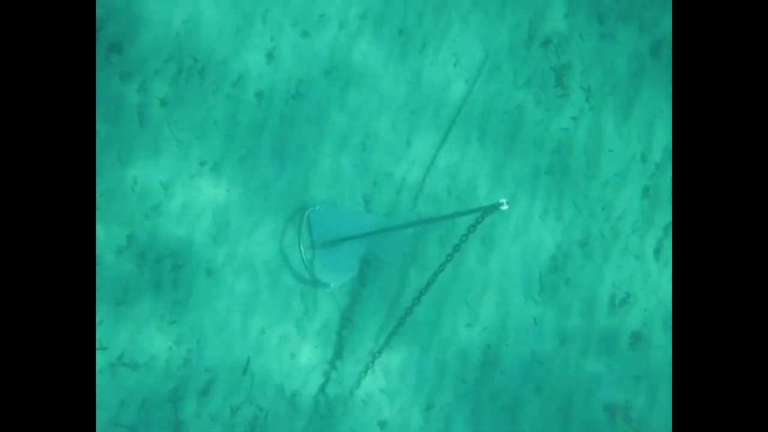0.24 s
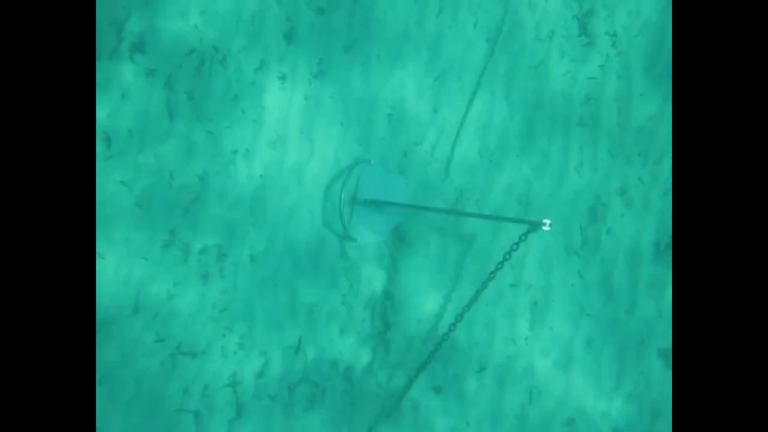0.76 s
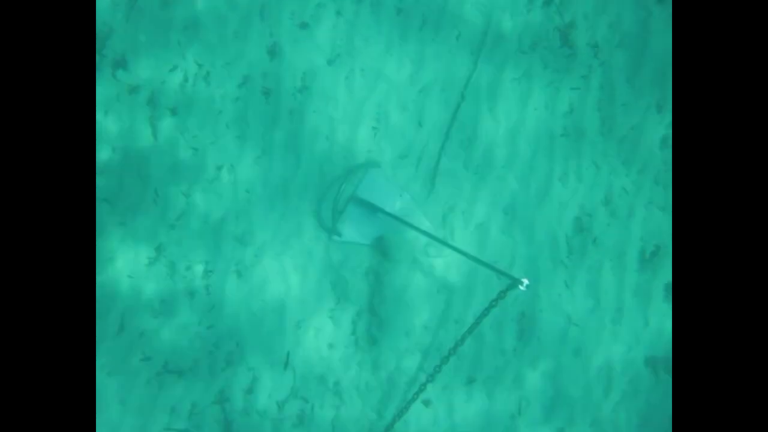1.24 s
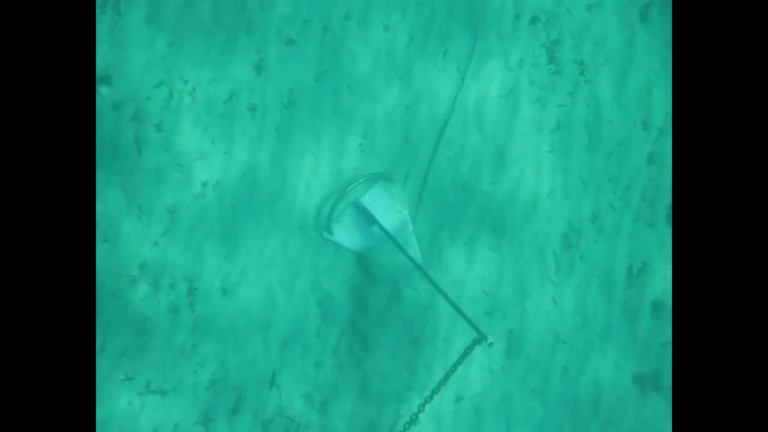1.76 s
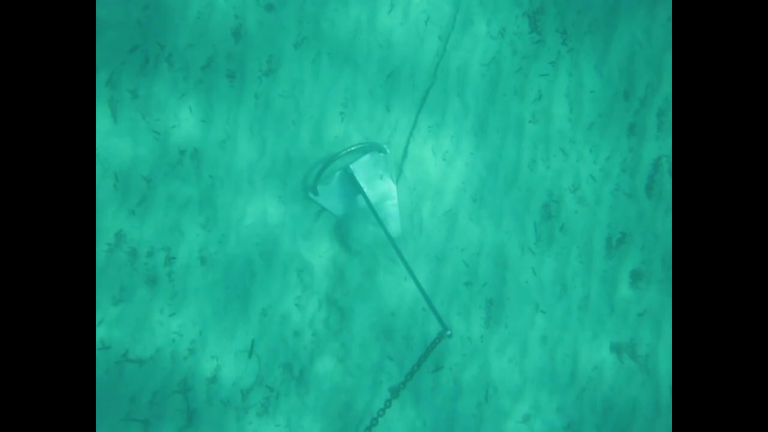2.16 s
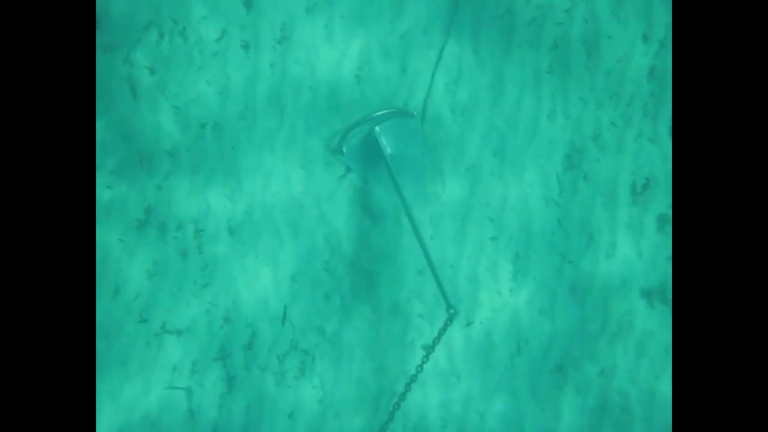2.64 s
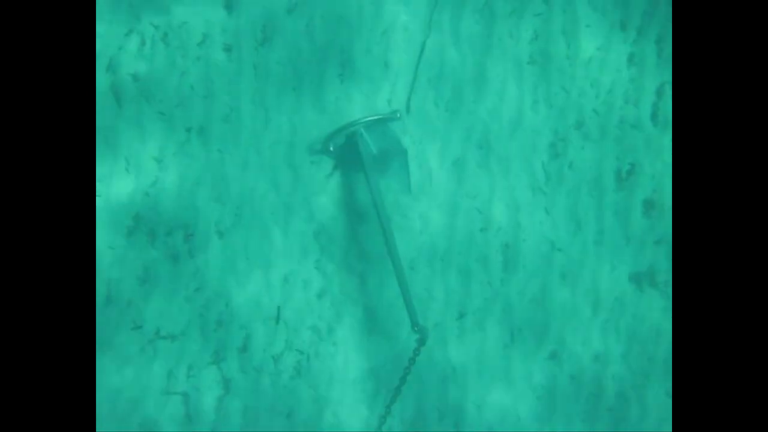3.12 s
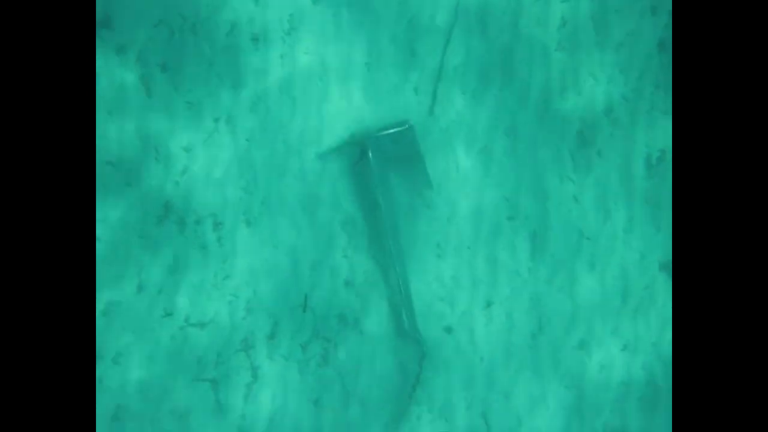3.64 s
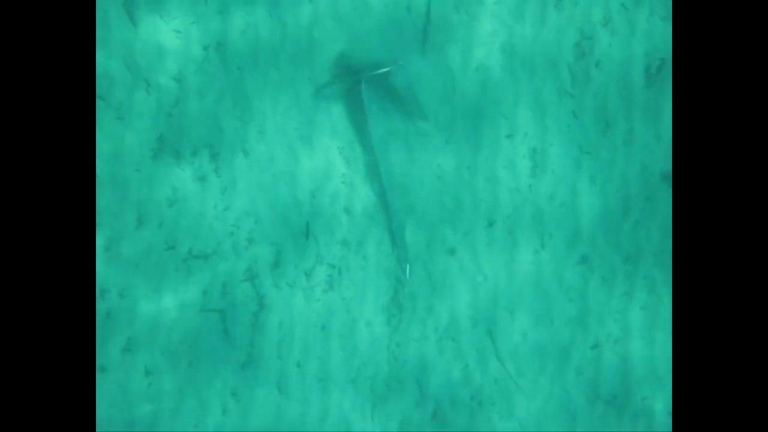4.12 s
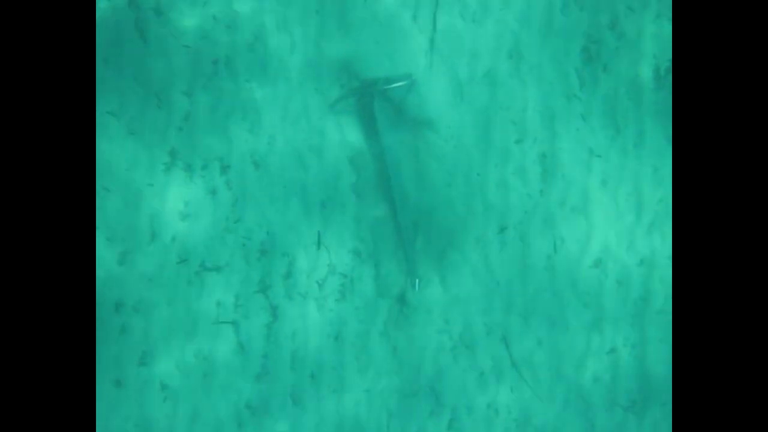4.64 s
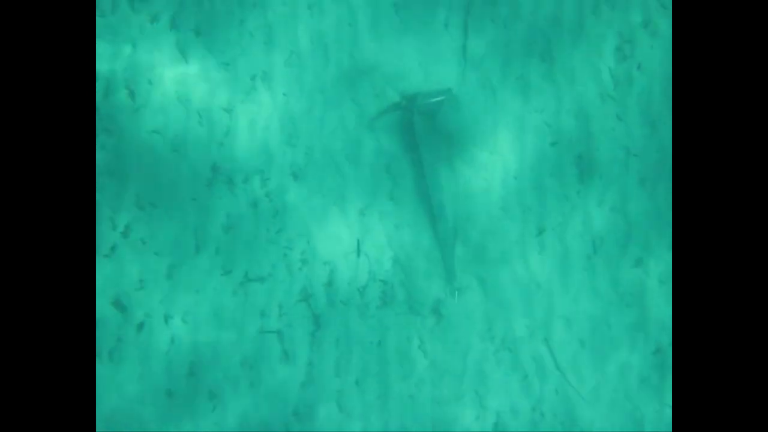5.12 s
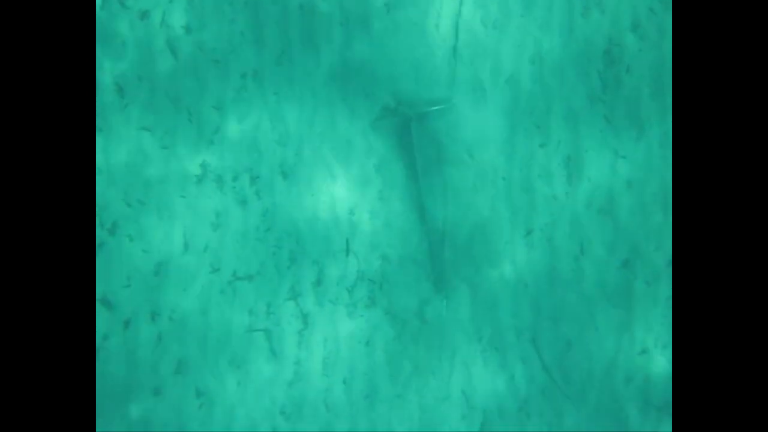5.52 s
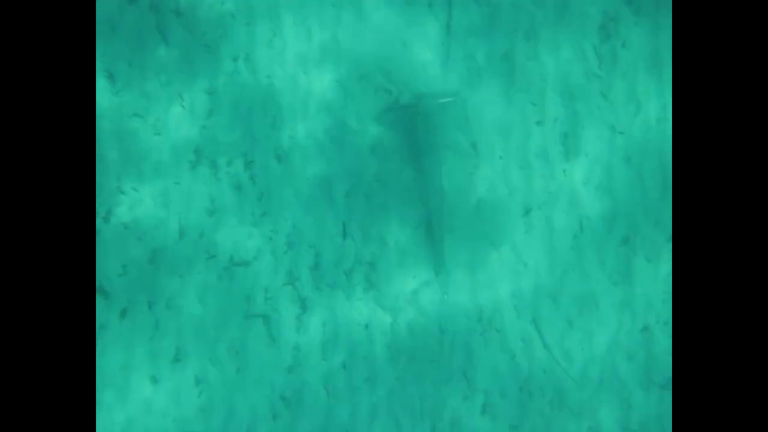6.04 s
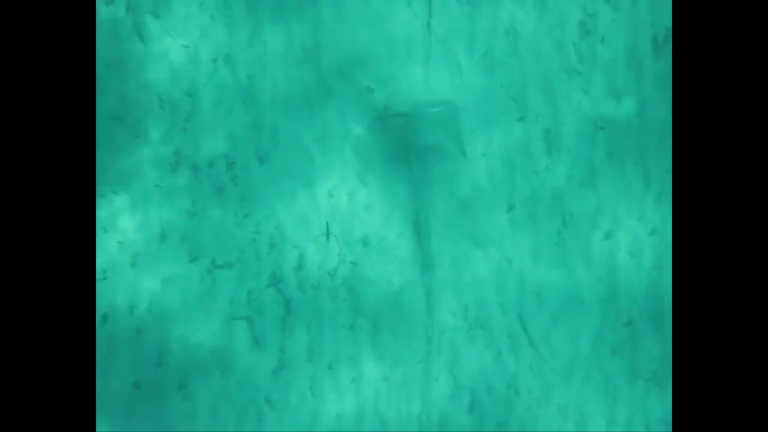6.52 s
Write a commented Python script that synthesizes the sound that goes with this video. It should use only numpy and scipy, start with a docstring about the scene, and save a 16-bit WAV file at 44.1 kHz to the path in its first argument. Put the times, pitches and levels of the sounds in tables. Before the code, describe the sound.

A boat propeller drones underwater, muffled and fluttering over thin fizz, with dull knocks, short creaks and a few anchor chain clinks.

```python
"""A boat runs astern and drags its anchor into sand, heard under water from inside a camera housing.
From the start, collapsing propeller bubbles ring the housing near 500 Hz: a muffled, fluttering drone
over thin fizz. From 0.7 s the housing is bumped; near 1.5 and 3 s it is knocked and creaks. The chain
clinks from 3.7 s, the fizz swells to 5.2 s as the anchor digs in, and two more knocks land near 6 s.
Throughout, the level dips briefly after the hardest blows and a limiter holds the peaks down."""
import sys
import numpy as np
from scipy import signal
from scipy.fft import rfft, irfft, next_fast_len
from scipy.io import wavfile
from scipy.ndimage import uniform_filter1d

SR = 44100
rng = np.random.default_rng(int(sys.argv[2]) if len(sys.argv) > 2 else 0)


def int16_out(signal):
    """Quantize to a 16-bit WAV file."""
    q = np.round(np.clip(np.atleast_2d(signal).T, -1, 1) * 32767)
    wavfile.write(sys.argv[1], SR, q.astype(np.int16))


N = 298557
TIME_S = np.arange(N) / SR


def gain_of(db):
    """Decibels to amplitude."""
    return 10 ** (np.asarray(db) / 20)


def unit_rms(x):
    """Scale to rms 1."""
    return x / np.sqrt(np.mean(x ** 2) + 1e-20)


def unit_peak(x):
    """Scale to peak 1."""
    return x / abs(x).max()


def add(mix, start_s, sound):
    """Mix a sound in at start_s."""
    part = mix[max(round(start_s * SR), 0):][:len(sound)]
    part += sound[:len(part)]


def bins_hz(size=8192):
    """FFT frequency grid."""
    return np.fft.rfftfreq(size, 1 / SR)


def colour(spectrum, hz):
    """Gain of an (f/Hz, level/dB) table, interpolated over log frequency."""
    points_hz, db = np.transpose(spectrum)
    return gain_of(np.interp(np.log(hz + 1), np.log(points_hz + 1), db))


def minimum_phase(gain):
    """Sharpest-starting impulse response with this gain."""
    log_gain = np.log(np.concatenate([gain, gain[-2:0:-1]]) + 1e-7)
    spectrum = np.exp(np.conj(signal.hilbert(log_gain)))
    return np.fft.ifft(spectrum).real[:len(gain)]


def wavering(samples, smooth_s):
    """Smoothed noise, rms 1."""
    return unit_rms(uniform_filter1d(rng.standard_normal(samples), max(int(smooth_s * SR), 1)))


# Housing resonances: f/Hz, width/Hz, relative level/dB
HOUSING_MODES = [(475.1, 52.8, 1.5), (530.3, 39.4, 1.5), (622.8, 81.4, -5), (744, 42, -14.5),
                 (808.3, 87, -20), (1002, 23, -37.5), (1146, 25, -39), (1292, 44, -37), (2023, 61, -47),
                 (2310, 220, -50.5), (3260, 260, -57.5)]
# Leak through the wall: f/Hz, relative level/dB
WALL_LEAK = [(15, -44), (40, -34), (150, -41), (300, -46.5), (1100, -45.5), (1600, -49), (2300, -70),
             (3300, -64.5), (4000, -68), (5300, -62), (7300, -73.5), (11000, -75.5), (15500, -76.5)]


def housing_ring():
    """Response to one pressure spike: strong low resonances over a weak leak."""
    hz = bins_hz()
    power = sum(gain_of(db) ** 2 / (1 + (2 * (hz - mode_hz) / width_hz) ** 2) ** 2
                for mode_hz, width_hz, db in HOUSING_MODES)
    return minimum_phase(np.sqrt(power + colour(WALL_LEAK, hz) ** 2))


def propeller(swarm_db=-17, rate_per_s=900, spread_db=2.0):
    """Bubbles of all sizes collapse at random; each rings the housing."""
    sizes = gain_of(spread_db * np.minimum(rng.exponential(1, N), 3.24))
    spikes = sizes * rng.choice([-1., 1.], N) * (rng.random(N) < rate_per_s / SR)
    return gain_of(swarm_db) * unit_rms(signal.oaconvolve(spikes, housing_ring())[:N])


# Loudest collapses: t/s, relative crunch level/dB, relative ring level/dB
COLLAPSES = [(.5905, -36, -10.5), (.6684, -32, -14), (.9372, -29.5, -6.5), (1.3512, -40.5, -3.5),
             (1.7115, -34, -11.5), (1.8824, -39, -8), (2.2188, -31.5, -7), (2.5136, -33.5, -9.5),
             (3.2251, -41, -3.5), (3.3424, -38.5, -7.5), (3.4176, -34, -9.5), (4.3798, -37.5, -8),
             (5.648, -35, -5), (5.8101, -34.5, -11.5), (6.0534, -35.5, -11), (6.4514, -40, -8.5)]


def pops(crunch_trim_db=-3, ring_trim_db=3, crunch_s=0.0025, lesser_per_s=8, spread_db=3, count=150):
    """Bubble clouds collapse: a short crunch through the wall while the housing rings."""
    out, t, hz = np.zeros(N), TIME_S[:1024], bins_hz()
    ring = unit_peak(housing_ring())
    leak = minimum_phase(colour(WALL_LEAK, hz) * hz ** 2 / (hz ** 2 + 1000 ** 2) / (1 + hz / 9000))
    lesser_s = np.cumsum(rng.gamma(2, .5, count)) / lesser_per_s
    scatter_db = spread_db * np.clip(rng.standard_normal((count, 2)), -2, 2)
    lesser_db = [-37.5, -17.5] + scatter_db  # crunch, ring
    for start_s, crunch_db, ring_db in [*COLLAPSES, *np.column_stack([lesser_s, lesser_db])]:
        burst = rng.standard_normal(len(t)) * t * np.exp(-t / crunch_s)
        crunch = unit_peak(signal.fftconvolve(burst, leak))
        add(out, start_s - crunch_s / 2, gain_of(crunch_db + crunch_trim_db) * crunch)
        add(out, start_s, gain_of(ring_db + ring_trim_db) * ring)
    return out


def drone(level_db=-14.0, window_s=.1):
    """The drone is held at an even level, so it ducks briefly around each loud pop."""
    bubbles = propeller() + pops()
    power = uniform_filter1d(bubbles ** 2, int(window_s * SR))
    return gain_of(level_db) * bubbles / np.sqrt(abs(power) + 1e-12)


def crackle(drone_wave, level_db=-53, rate_per_s=3000, steepness=1.7, low_hz=1000, high_hz=2600):
    """Fine, sharp crackle in clumps, loudest at each swell of the drone."""
    swell = unit_rms(abs(signal.hilbert(drone_wave, next_fast_len(N)))[:N])
    clicks = rng.standard_normal(N) * (rng.random(N) < rate_per_s / SR) * swell ** steepness
    hz = bins_hz()
    grain = minimum_phase(hz ** 2 / (hz ** 2 + low_hz ** 2) / (1 + (hz / high_hz) ** 3))
    return gain_of(level_db) * unit_rms(signal.oaconvolve(clicks, grain)[:N])


# Far, fine bubbles: f/Hz, relative level/dB
FIZZ_SPECTRUM = [(30, 15.5), (1200, 17), (2300, -2), (2700, -4), (3250, 2.5), (3900, -14), (4700, 4.5),
                 (5600, 2.5), (6100, -23.5), (7000, -16), (7900, -4.5), (11000, -17), (15500, -20.5)]
# Swell as the anchor digs in: t/s, relative level/dB
FIZZ_ENVELOPE = [(0, -45), (1.3, -47.5), (2.6, -45), (3.5, -52), (4.1, -44.5), (5.2, -41), (5.45, -51),
                 (6.77, -49.5)]


def fizz(trim_db=-3.0, flicker_db=3.5, flicker_s=.025):
    """Countless far bubbles merge into a flickering hiss."""
    spectrum = rfft(rng.standard_normal(N)) * colour(FIZZ_SPECTRUM, bins_hz(N))
    hiss = unit_rms(irfft(spectrum, N))
    swell_db = np.interp(TIME_S, *np.transpose(FIZZ_ENVELOPE))
    return hiss * gain_of(swell_db + trim_db + flicker_db * wavering(N, flicker_s))


# Thin whine: f/Hz, rms level/dB
WHINE_TONES = [(7822, -86), (7852, -80), (7882, -75), (7912, -82.5), (12600, -91)]


def whine():
    """Steady high tones; the close ones beat."""
    return sum(gain_of(db) * np.sqrt(2) * np.sin(2 * np.pi * (hz * TIME_S + rng.random()))
               for hz, db in WHINE_TONES)


def rumble(length_s, centre_hz, width_hz):
    """Short swell of band noise, rms 1."""
    hz = bins_hz()
    band = 1 / (1 + ((hz - centre_hz) / width_hz) ** 4) * hz / (hz + 60)
    white = rng.standard_normal(2 * len(hz) - 2)
    noise = irfft(rfft(white) * band)[:int(length_s * SR)]
    return unit_rms(noise * signal.windows.tukey(len(noise), .7))


# Dull bumps, rubs and swirls of water: t/s, rms level/dB, length/s, centre/Hz, half-width/Hz
SOFT_CONTACTS = [(0.743, -20, 0.051, 250, 220), (0.924, -27, 0.042, 400, 150), (1.33, -19, 0.065, 543, 330),
                 (1.37, -28.5, 0.088, 200, 110), (1.435, -17.5, .06, 340, 150),
                 (1.768, -17.5, 0.019, 343, 120), (2.214, -16.5, 0.022, 300, 190),
                 (2.507, -24, 0.033, 785, 130), (2.96, -20.5, 0.041, 300, 240),
                 (3.151, -31, 0.055, 140, 110), (3.172, -23, .02, 680, 280), (3.223, -30, 0.087, 730, 190),
                 (3.761, -16.5, 0.0196, 373, 110), (4.659, -30, 0.03, 124, 110),
                 (5.968, -17.5, .014, 758, 258), (5.995, -23.5, 0.074, 310, 129),
                 (6.139, -26, 0.12, 277, 130), (6.649, -34.5, 0.092, 230, 172)]


def bumps(gurgles=2, gurgle_db=-16, gurgle_s=0.037, scatter_s=.07, low_hz=164, high_hz=890):
    """Soft contacts on the housing; each stirs the water, which gurgles around it."""
    out = np.zeros(N)
    for start_s, db, length_s, centre_hz, width_hz in SOFT_CONTACTS:
        add(out, start_s, gain_of(db) * rumble(length_s, centre_hz, width_hz))
        for when, pitch in rng.random((gurgles, 2)):
            gurgle = rumble(gurgle_s, low_hz * (high_hz / low_hz) ** pitch, width_hz=70)
            add(out, start_s + scatter_s * (2 * when - .5), gain_of(db + gurgle_db) * gurgle)
    return out


# Dips after the hardest blows: t/s, depth/dB, hold/s
LEVEL_DIPS = [(.947, 13, 0.057), (1.486, 14.5, .115), (2.994, 16.5, 0.13), (3.775, 10, 0.033),
              (5.982, 6.5, 0.022), (6.236, 9, 0.017)]


def dips(fall_s, recovery_db_per_s=229.5):
    """Gain that sinks at each listed time, holds, and climbs back."""
    down_db = np.zeros(N)
    for start_s, depth_db, hold_s in LEVEL_DIPS:
        t = np.maximum(TIME_S - start_s, 0)
        remaining_db = np.clip(depth_db - recovery_db_per_s * (t - hold_s), 0, depth_db)
        down_db += remaining_db * (1 - np.exp(-t / fall_s))
    return gain_of(-down_db)


def ticks(base_db=-35, spread_db=7, reference_depth_db=17, per_dip=6):
    """Faint dry ticks sputter during the dips, louder in the deeper ones."""
    out, tick = np.zeros(N), pulse(WALL_LEAK)
    for start_s, depth_db, hold_s in LEVEL_DIPS:
        for when, size in rng.random((per_dip, 2)):
            db = base_db + 2 * (depth_db - reference_depth_db) + spread_db * (2 * size - 0.5)
            add(out, start_s + when * hold_s * .75, gain_of(db) * tick)
    return out


def pulse(spectrum, pitch_ratio=1, crack_db=0, crack_hz=1300):
    """Sharp pulse, peak 1: the spectrum scaled in pitch and shelved above crack_hz."""
    hz = bins_hz()
    treble = 1 - 1 / (1 + (hz / crack_hz) ** 8)
    return unit_peak(minimum_phase(colour(spectrum, hz / pitch_ratio) * gain_of(crack_db * treble)))


# Knocks on the housing: t/s, peak level/dB, pitch ratio, treble shelf/dB
HARD_CONTACTS = [(1.4708, 2.5, 1.083, 4), (2.9775, 2.5, 1.1, 3), (2.9842, -2.5, 0.83, -8),
                 (5.971, -1, 1.14, -12), (6.2295, -2.5, 1.05, 1)]
# Struck housing: f/Hz, relative level/dB
KNOCK_SPECTRUM = [(30, -18.5), (250, -14), (520, 23.5), (850, -11.5), (1100, -14.5), (1500, -16),
                  (1950, -17.5), (2600, -38), (4500, -47.5), (8000, -52), (15500, -49.5)]


def knocks(rebound_gain=0.31, rebound_s=.0018):
    """Hard contacts on the housing, each with one rebound."""
    out = np.zeros(N)
    for start_s, db, pitch_ratio, crack_db in HARD_CONTACTS:
        contact = gain_of(db) * pulse(KNOCK_SPECTRUM, pitch_ratio, crack_db)
        add(out, start_s, contact)
        add(out, start_s + rebound_s, rebound_gain * contact)
    return out


# Housing creaks, one list each: t/s, f/Hz, level/dB
CREAK_TRACKS = [
    [(1.474, 430, -21), (1.495, 365, -13), (1.52, 307, -35.5), (1.556, 275.4, -12.5), (1.58, 157, -32)],
    [(1.615, 181.6, -28.5), (1.68, 216.5, -39), (1.75, 234, -40), (1.81, 220, -32)],
    [(2.985, 423, -23), (3.005, 341, -14.5), (3.024, 289.4, -12.5), (3.055, 266, -21), (3.08, 251, -18.5),
     (3.1, 140, -31), (3.125, 109.4, -39.5)],
]


def creaks(octave_db=-2, third_harmonic_db=-28, jitter=0.045, rough_db=3, slip_s=0.008):
    """The housing sticks and slips in the grip; pitch follows sliding speed."""
    out = np.zeros(N)
    for track in CREAK_TRACKS:
        times_s, hz, db = np.transpose(track)
        t = np.arange(times_s[0], times_s[-1], 1 / SR)
        pitch_hz = np.interp(t, times_s, hz) * (1 + jitter * wavering(len(t), slip_s))
        phase = 2 * np.pi * np.cumsum(pitch_hz) / SR
        tone = np.sin(phase) + gain_of(octave_db) * np.sin(2 * phase)
        tone += gain_of(third_harmonic_db) * np.sin(3 * phase)
        roughness = np.tanh(uniform_filter1d(wavering(len(t), slip_s), size=90))
        grip = gain_of(np.interp(t, times_s, db) + rough_db * roughness)
        add(out, times_s[0], np.sqrt(2) * tone * grip * signal.windows.tukey(len(t), .15))
    return out


# Links strike and scrape: t/s, peak level/dB, rise/s
LINK_STRIKES = [(3.703, -32, 0.0036), (3.726, -28, 0.0017), (3.7655, -13, 0.0013), (3.8238, -33.5, 0.00096),
                (4.495, -39.5, 0.0013)]
# Ring of a link: f/Hz, relative level/dB, t60/s
LINK_MODES = [(1590, 2, 0.033), (1546, -28, 0.19), (2140, -19, .16), (2200, 0, 0.0088), (3020, -1, 0.02),
              (3380, -9.5, 0.019), (4150, 4.5, 0.015), (4420, -16.5, .08), (4520, -19, 0.047),
              (5180, 5.5, 0.016), (7370, -16, .012), (9050, -24, 0.018), (10020, -22, .011)]


def chain(crack_db=9, lowpass_hz=7000, thud_db=5):
    """Steel grates on steel: a dry crack, a water-damped ring, and a thud in the housing."""
    out, t = np.zeros(N), TIME_S[:SR // 8]
    thud = unit_peak(housing_ring())
    ring = sum(gain_of(db - 60 * t / t60_s) * np.cos(2 * np.pi * hz * t) for hz, db, t60_s in LINK_MODES)
    ring[0] += gain_of(crack_db)
    ring = signal.lfilter(*signal.butter(1, lowpass_hz, fs=SR), ring)
    for start_s, db, rise_s in LINK_STRIKES:
        scrape = rng.standard_normal(len(t)) * t * np.exp(-t / rise_s)
        add(out, start_s, gain_of(db) * unit_peak(signal.fftconvolve(scrape, ring)))
        add(out, start_s, gain_of(db + thud_db) * thud)
    return out


def limiter(x, threshold_db=-13.5, slope=0.39, recovery_db_per_s=130, attack_s=0.00056):
    """Gain steps down at each rising crest over the threshold, crackling faintly, then recovers."""
    level_db = 20 * np.log10(abs(x) + 1e-9)
    recovery_db = TIME_S * recovery_db_per_s
    held_db = np.maximum.accumulate(level_db + recovery_db) - recovery_db
    over_db = np.maximum(held_db - threshold_db, 0)
    pole = np.exp(-1 / (attack_s * SR))
    return x / gain_of(slope * signal.lfilter([1 - pole], [1, -pole], over_db))


def scene():
    """Steady boat sound plus near contacts; in a dip the hiss sinks faster than the drone."""
    drone_wave = drone()
    hiss = crackle(drone_wave) + fizz() + whine()
    steady = drone_wave * dips(fall_s=0.047) + hiss * dips(fall_s=.014)
    return (steady + ticks() + bumps() + knocks() + creaks() + chain())[None]


def record(dry, ceiling=0.58, notch_hz=6350, notch_width_hz=1500, cutoff_hz=15780):
    """Camera chain: limiter, clipping of the hardest knocks, treble notch, band limit."""
    clipped = np.clip(limiter(dry[0]), -ceiling, ceiling)
    notched = signal.lfilter(*signal.iirnotch(notch_hz, notch_hz / notch_width_hz, fs=SR), clipped)
    lowpass = signal.firwin(1023, cutoff_hz, window=("kaiser", 9), fs=SR)
    end_fades = signal.windows.tukey(N, .001)
    return signal.oaconvolve(notched * end_fades, lowpass, "same")[None]


dry = scene()
out = record(dry)
int16_out(out)
```